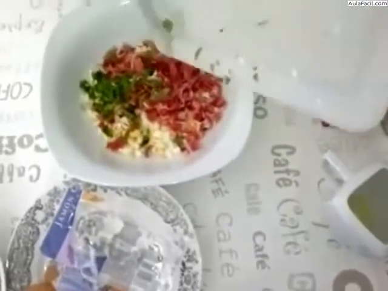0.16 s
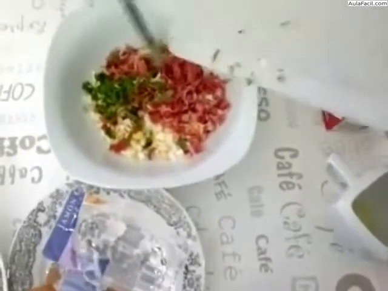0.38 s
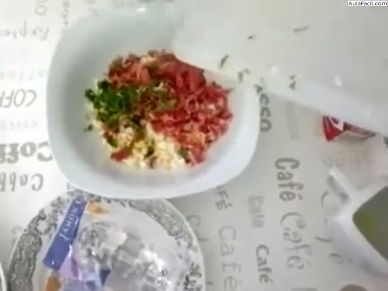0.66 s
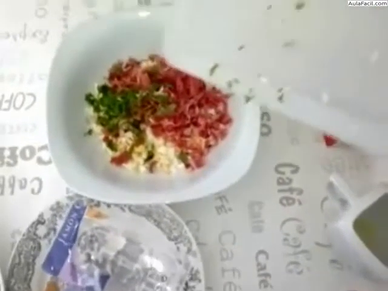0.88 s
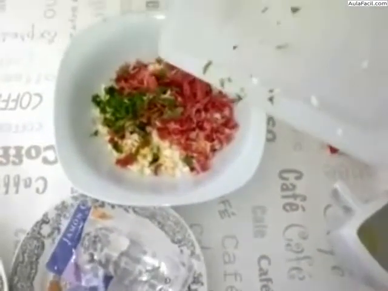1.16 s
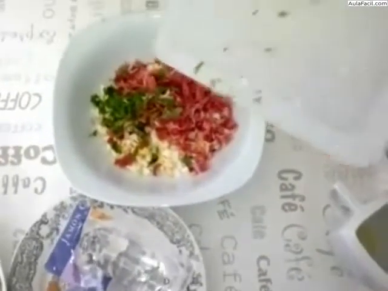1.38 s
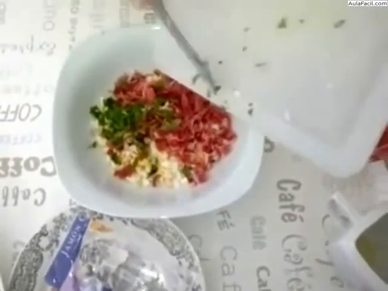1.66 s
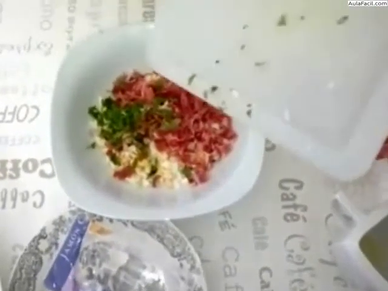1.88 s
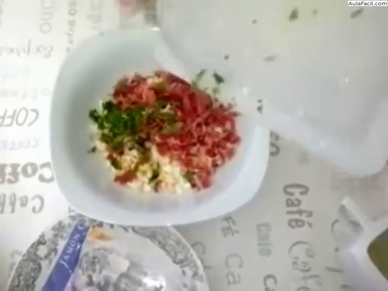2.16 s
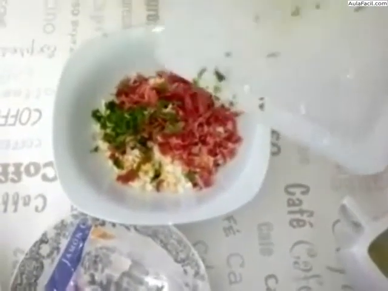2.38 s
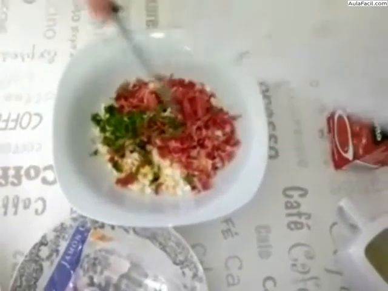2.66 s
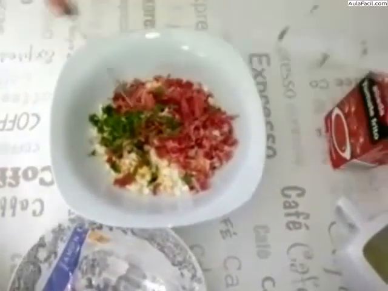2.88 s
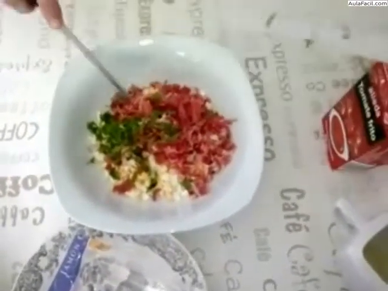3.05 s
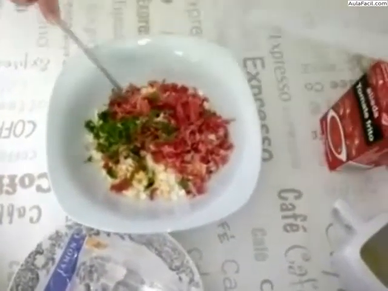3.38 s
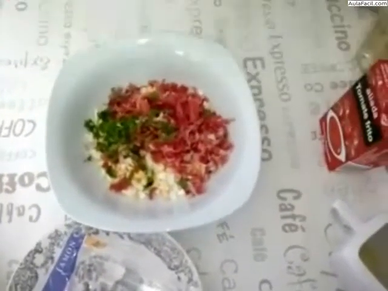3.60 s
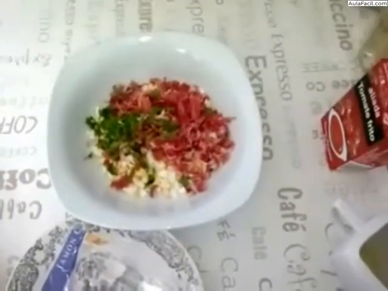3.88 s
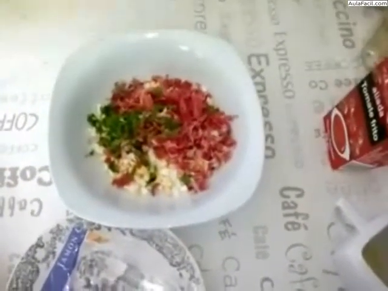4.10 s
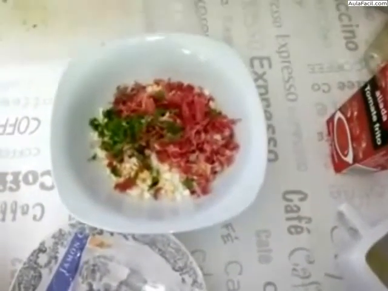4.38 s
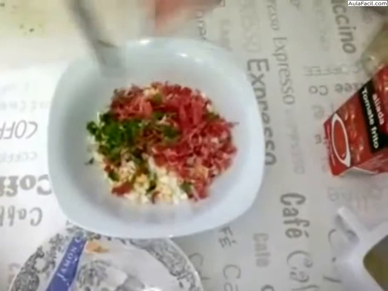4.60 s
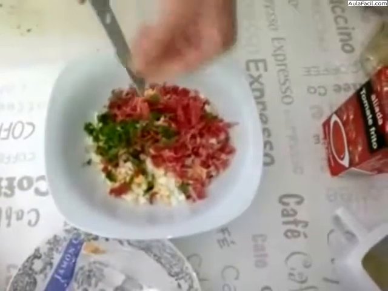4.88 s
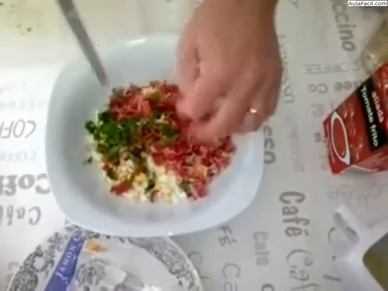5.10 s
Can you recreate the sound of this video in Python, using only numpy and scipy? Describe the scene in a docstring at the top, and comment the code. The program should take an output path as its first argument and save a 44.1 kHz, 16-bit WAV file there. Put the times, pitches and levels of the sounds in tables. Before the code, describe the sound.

A knife scrapes food off a plastic cutting board in quick strokes, then a bowl is knocked and rings, and the board bumps down.

```python
"""A small hard kitchen: a knife scrapes chopped food off a plastic cutting board into a bowl.
In eight quick strokes the blade taps down, then sticks and slips along the board with a rising hiss.
Three chattering knocks set the crockery ringing, then the board is put down with a dull bump.
Hands rock the board and rustle in the food, over faint room air and an appliance hum."""
import sys
import numpy as np
from scipy import signal
from scipy.fft import rfft, irfft
from scipy.io import wavfile
from scipy.ndimage import uniform_filter1d

SR = 44100
rng = np.random.default_rng(int(sys.argv[2]) if len(sys.argv) > 2 else 0)


def pcm_store(signal):
    """Save signal as 16-bit PCM."""
    levels = np.round(np.clip(np.atleast_2d(signal), -1, 1) * 32767)
    wavfile.write(sys.argv[1], SR, levels.astype(np.int16).T)


N = 231182
TIME = np.arange(N) / SR

# The knife strokes. Each row: start, length and time to full speed in seconds; flex, rasp and hiss
# levels in dB; the board's bending pitch at the start and at the end in Hz.
STROKES = [(0.0, .1, 0.0033, -25, -21, -35.5, 390, 480),
           (0.428, 0.079, 0.027, -35.5, -25.5, -37.5, 490, 490),
           (0.761, 0.07, 0.1, -28.5, -13, -29.5, 588, 550),
           (1.033, 0.042, 0.032, -29, -28, -36.5, 298, 406), (1.486, .25, .13, -23.5, -20, -39, 312, 327.4),
           (2.022, 0.14, 0.063, -25.5, -16.5, -33.5, 292, 464),
           (2.446, 0.15, 0.13, -23.5, -15, -30, 293, 507), (2.869, 0.12, 0.098, -24, -16.5, -28, 410, 610)]
# The blade lands or catches. Each row: start in seconds, click level in dB, flex level in dB.
TAPS = [(0.083, 9, -6), (0.432, -4.5, -21), (0.763, 6.5, -16), (1.0396, 9.5, -5.5), (1.480, -0.5, -8.5),
        (1.622, 5, -3), (1.706, 1, -5), (1.724, 4, -2.5), (2.0102, -2, 0.5), (2.033, 1.5, -16),
        (2.04, 6.5, 0.5), (2.096, 9.5, -2.5), (2.4271, -1, -1), (2.458, -13.5, -26.5), (2.86, -6.5, -10),
        (2.941, 13, -10), (2.95, 6, -9), (2.963, 11, -15)]
# The board's narrow modes. Each row: pitch in Hz, width in Hz, relative level in dB.
BOARD_MODES = [(618, 80, -11), (1161, 60, -17), (1513, 100, -11), (1612, 110, -9)]
# The hollow body of the flexing board. Each row: frequency in Hz, level in dB.
FLEX_EQ = [(30, -22), (120, -11), (220, -12), (300, -6.5), (450, 0.5), (620, 0), (760, -1), (940, -6.5),
           (1150, -1), (1350, -14.5), (2000, -39), (3200, -70.5)]
# The midrange bite of the slips. Each row: frequency in Hz, level in dB.
RASP_EQ = [(300, -37.5), (900, -21.5), (1280, -10), (1450, 0.5), (1600, 2.5), (1880, -0.5), (2150, -8),
           (2600, -17), (3300, -41), (6000, -81.5)]

def scraping():
    """Taps and stick-slip jolts flex and ring the board, under the hiss of the blade."""
    flex, rasp, hiss = sum(stroke(*row) for *row, _, _ in STROKES)
    push = amp(-1.5) * flex * slips(per_s=900, spread_db=2)
    click = amp(-3.5) * rasp * slips(per_s=580, spread_db=3)
    grain = slips(per_s=2800, spread_db=0) * amp(2 * drift(hz=120))
    bending = amp(-11.5) * resonate(push, bending_pitch(), width=110)
    # rubbing keeps the board's narrow modes singing
    rubbing = amp(-3) * np.sqrt(flex * rasp) * slips(per_s=1500, spread_db=3.5)
    singing = sum(amp(db) * resonate(rubbing, hz, width) for hz, width, db in BOARD_MODES)
    for start, click_db, flex_db in TAPS:
        add(click, start, amp([click_db]))
        add(push, start, amp([flex_db]))
    return bending + singing + colour(push, FLEX_EQ) + colour(click, RASP_EQ) + blade(hiss * grain)


# How flex, rasp and hiss follow a stroke. Each row: dB lost while the blade is slow, dB lost as it
# lifts (negative swells).
STROKE_LOSSES = [(4, 11), (11, 9.5), (30, -3.5)]

def stroke(start, length, rise, flex_db, rasp_db, hiss_db, release_s=0.007):
    """The blade gathers speed, then lifts off: envelopes for flex, rasp and hiss."""
    age = np.maximum(TIME - start, 0)
    slow = np.maximum(1 - age / rise, 0) ** 2.7
    lift = np.minimum(age / length, 1) ** 3.08
    contact = (TIME >= start) * np.exp(-np.maximum(age - length, 0) / release_s)
    return np.array([contact * amp(db - slow_db * slow - lift_db * lift)
                     for db, (slow_db, lift_db) in zip((flex_db, rasp_db, hiss_db), STROKE_LOSSES)])


def bending_pitch():
    """The board's bending mode glides as the blade presses at different places."""
    hz = np.zeros(N)
    for start, length, *_, from_hz, to_hz in STROKES:
        travel = np.clip((TIME - start) / length, 0, 1) ** 2.1
        glide = from_hz + (to_hz - from_hz) * travel
        hz = np.where((TIME >= start - .02) | (hz == 0), glide, hz)
    return hz


# The blade's ring. Each row: centre pitch in Hz, width in Hz, relative level in dB.
BLADE_MODES = [(2550, 400, -10), (3400, 520, -11), (4500, 380, -13), (5870, 450, -15), (7180, 220, -19)]
# The bright hiss of the edge. Each row: frequency in Hz, level in dB.
HISS_EQ = [(800, -12.5), (2000, -6), (2700, 3), (3450, 3.5), (4100, -1.5), (4550, -6), (5200, -5.5),
           (6000, -6), (7500, -12), (9000, -13), (10200, -35)]

def blade(grain):
    """The edge hisses over the grain; the blade's resonances slide as the point of contact moves."""
    slide = 1 + 0.038 * drift(hz=6.4)
    ringing = sum(amp(db) * resonate(grain, hz * slide, width) for hz, width, db in BLADE_MODES)
    return colour(grain, HISS_EQ) + amp(-2.2) * ringing


# Hits on the dish; the first three blur into one knock. Each row: start in seconds; clack, crack and
# ring levels in dB; base chatter time in seconds; the pitch the contact favours in Hz.
KNOCKS = [(3.5185, 17.5, -26, -1, 0.0096, 1600), (3.526, 20.5, -6, 14, 0.0052, 1670),
          (3.530, 6.5, 14.5, 14.5, 0.0057, 2240), (3.6558, 19, 12.5, 15.5, 0.0055, 2190),
          (3.7437, 20, 7, 14, 0.0091, 1520)]
# The hard clack of crockery. Each row: frequency in Hz, level in dB.
CLACK_EQ = [(30, -22.5), (130, -21), (260, -6.5), (520, -15), (750, -8), (950, -17.5), (1300, -10),
            (1580, 6), (1900, -8), (2200, -0.5), (2700, -27), (4000, -34.5), (8000, -59.5)]

def knocks():
    """Each chattering knock gives a short hard clack and a longer bright crack."""
    clack, crack = np.zeros((2, N))
    for start, clack_db, crack_db, _, length, _ in KNOCKS:
        add(clack, start, amp(clack_db) * chatter(length * 0.57, share=0.62))
        add(crack, start, amp(crack_db) * chatter(length * 2.7, share=0.94))
    return colour(clack, CLACK_EQ) + colour(crack, HISS_EQ)


# The dish's ring. Each row: pitch in Hz, level in dB, seconds to fade by 60 dB.
DISH_MODES = [(267, -16, .25), (765, -13, .25), (1515, -4, .25), (1558, -2, .25), (1618, -2, .18),
              (2125, -7, .13), (2194, -1, .15), (2280, -13, .22), (2903, -1, .31), (3411, -8, .22),
              (3533, 0, .28), (3569, -8, .3), (4353, 1, .31), (5155, -12, .22), (5440, -15, .2),
              (6169, -12, .2), (7340, -13, .16)]

def dish():
    """The knocked dish rings on in its modes; loose contact makes each mode flutter."""
    out, t = np.zeros(N), np.arange(SR // 2) / SR
    hz, db, t60 = np.transpose(DISH_MODES)[:, :, None]
    flutter_times = np.arange(0, t[-1] + .02, .007)
    shape = (len(DISH_MODES), len(flutter_times))
    attack = 1 - np.exp(-t / 0.002)
    for start, _, _, ring_db, _, favoured_hz in KNOCKS:
        shake = rng.standard_normal(shape) + 1j * rng.standard_normal(shape)
        flutter = 1 + .4 * np.array([np.interp(t, flutter_times, row) for row in shake])
        swing = (flutter * np.exp(2j * np.pi * (hz * t + rng.random(hz.shape)))).real
        # while the contact lasts it drives the modes near one pitch hardest
        driven_db = 9 * np.exp(-((hz - favoured_hz) / 120) ** 2 - (t / 0.023) ** 2)
        ring = (amp(db + driven_db - 60 * t / t60) * swing).sum(0) * attack
        add(out, start, amp(ring_db) * ring / np.linalg.norm(ring))
    return out


# The board lands and settles. Each row: start in seconds, level in dB, chatter time in seconds.
BUMPS = [(4.5175, 2, .004), (4.536, 0, .005), (4.583, 1, .003), (4.615, -10, .008)]
# The dull weight of that landing. Each row: frequency in Hz, level in dB.
THUD_EQ = [(25, -4), (80, 6), (150, -1), (280, -1), (450, -5.5), (800, -2.5), (1050, -11), (1550, -0.5),
           (2100, -9.5), (2800, -21), (4500, -40.5), (7000, -99)]

def board_set_down():
    """The board bumps onto the table in a quick cluster of blows."""
    blows = np.zeros(N)
    for start, db, length in BUMPS:
        add(blows, start, amp(db) * chatter(length, share=0.85))
    return colour(blows, THUD_EQ)


# The board rocks in the hand, then things shift on the table.
# Each row: start in seconds, level in dB, chatter time in seconds.
NUDGES = [(0.0, -9, 0.022), (.95, -19.5, 0.054), (1.04, -13, 0.03), (1.172, -15.5, 0.017),
          (1.485, -7, 0.063), (1.9, -19.5, 0.016), (2.4, -15, .063), (3.37, -13, 0.22),
          (4.64, -10.5, 0.072), (4.83, -16.5, 0.047), (4.92, -12.5, .06), (5.04, -18, .035)]
# Fingers in the food. Each row: start in seconds, length in seconds, level in dB.
RUSTLES = [(4.823, 0.23, -63), (5.051, 0.087, -51)]
# The soft low end of handling. Each row: frequency in Hz, level in dB.
RUMBLE_EQ = [(20, -0.5), (45, -2), (80, -3), (110, -1.5), (160, -4), (230, -15), (600, -22), (1500, -54)]

def handling():
    """Hands and knocks jolt board and table into a rumble and a boom; fingers rustle in the food."""
    push, rustle = np.zeros((2, N))
    for start, db, length in NUDGES:
        add(push, start, amp(db) * chatter(length, share=0.92))
    for start, clack_db, *_ in KNOCKS:
        add(push, start, amp(clack_db - 27.5) * chatter(0.009, share=0.92))
    for start, length, db in RUSTLES:
        add(rustle, start, amp(db) * np.hanning(round(length * SR)))
    table_boom = amp(-5.5) * resonate(push, hz=131.2, width=38)
    crumbs = slips(per_s=4000, spread_db=2)
    return colour(push, RUMBLE_EQ) + table_boom + colour(rustle * crumbs, RASP_EQ)


# The kitchen's short tail. Each row: frequency in Hz, seconds to fade by 60 dB.
KITCHEN_DECAY = [(150, .38), (400, .31), (1040, .28), (2760, .26), (7280, .225)]

def kitchen(x, wet_db):
    """Direct sound plus dense reflections from table and walls, each band dying at its own speed."""
    t = np.arange(SR) / SR
    build_up = np.clip((t - .002) / 0.0041, 0, 1)
    echoes = rng.choice([-1., 1.], SR) * (rng.random(SR) < 5000 / SR) * build_up
    hz, when, bands = signal.stft(echoes, SR, nperseg=256)
    decay = amp(-60 * when / curve_at(KITCHEN_DECAY, hz)[:, None])
    tail = signal.istft(bands * decay, SR, nperseg=256)[1]
    # the many paths share the energy evenly over broad bands
    paths = rfft(tail)
    band_power = uniform_filter1d(abs(paths) ** 2, size=250)
    tail = irfft(paths / np.sqrt(band_power))[:len(tail) * 3 // 4]
    wet = amp(wet_db)
    return (x + wet * signal.fftconvolve(x, tail)[:N]) / np.hypot(1, wet)


def moving_reflections(x, sets=4, shifts_per_s=11):
    """A moving source meets changing reflections: it fades from one set into the next."""
    place = TIME * shifts_per_s
    distances = [abs((place - k + sets / 2) % sets - sets / 2) for k in range(sets)]
    fades = [np.cos(np.pi / 2 * np.minimum(distance, 1)) ** 2 for distance in distances]
    return sum(kitchen(x * fade, wet_db=1.5) for fade in fades)


# The room tone. Each row: frequency in Hz, level in dB.
AIR_EQ = [(15, -42.5), (25, -12), (75, -20), (141, -10), (436, -18.5), (519, -10.5), (603, -23),
          (924, -18.5), (1130, -21.5), (1220, -14), (1310, -12.5), (1960, -12.5), (2860, -26.5),
          (8600, -38), (10000, -53), (13000, -85.5), (22000, -120)]
# The appliance hum. Each row: pitch in Hz, width in Hz, level in dB.
HUM_TONES = [(137, 24, -68), (500, 10, -77)]

def air_and_hum():
    """Faint room air and a wavering appliance hum, both shaped from noise."""
    air = amp(-63.5) * colour(rng.standard_normal(N), AIR_EQ) * amp(drift(hz=8))
    hum = sum(amp(db) * resonate(rng.standard_normal(N), hz, width) for hz, width, db in HUM_TONES)
    return air + hum


def slips(per_s, spread_db):
    """An irregular train of small jolts of uneven size."""
    size = amp(spread_db * np.clip(rng.standard_normal(N), -2, 2)) * rng.choice([-1, 1], N)
    return unit_rms(size * (rng.random(N) < per_s / SR))


def chatter(length, share, size=12000):
    """One jolt, then a swelling, dying rattle of tiny contacts that takes a share of the unit energy."""
    age = np.arange(size) / SR / length
    rattle = rng.choice([-1, 1], size) * np.sqrt(age) * np.exp(-age)
    rattle *= np.sqrt(share) / np.linalg.norm(rattle)
    rattle[0] = np.sqrt(1 - share)
    return rattle


def resonate(x, hz, width):
    """A steep resonance of unit energy that follows a steady or moving pitch."""
    turn = np.exp(2j * np.pi * np.cumsum(hz * np.ones(N)) / SR)
    pole = np.exp(-np.pi * width / SR)
    gain = np.sqrt(8 * (1 - pole) ** 3)
    return (turn * signal.lfilter([gain], [1, -2 * pole, pole * pole], x / turn)).real


def colour(x, eq, size=4096):
    """A causal filter of unit energy, shaped like the EQ curve."""
    log_gain = np.log(amp(curve_at(eq, abs(np.fft.fftfreq(size, 1 / SR)))))
    response = np.fft.ifft(np.exp(np.conj(signal.hilbert(log_gain)))).real[:size // 2]
    return signal.oaconvolve(x, response / np.linalg.norm(response))[:N]


def drift(hz):
    """Smooth random motion of unit size, mostly slower than hz."""
    low_pass = np.exp(-(np.fft.rfftfreq(N, 1 / SR) / hz) ** 2)
    return unit_rms(irfft(rfft(rng.standard_normal(N)) * low_pass, N))


def curve_at(points, hz):
    """Joins (Hz, value) points by straight lines on a log-frequency axis."""
    point_hz, value = np.transpose(points)
    return np.interp(np.log(hz + 1), np.log(point_hz + 1), value)


def add(mix, start, sound):
    """Mixes a sound in at a start time in seconds."""
    part = mix[max(round(start * SR), 0):][:len(sound)]
    part += sound[:len(part)]


def amp(db):
    return 10 ** (np.asarray(db) / 20)


def unit_rms(x):
    return x / np.sqrt(np.mean(x ** 2) + 1e-20)


def scene():
    """Scraping, knocks and handling in the kitchen, with a drier dish ring, over air and hum."""
    scrapes = moving_reflections(scraping())
    impacts = kitchen(knocks() + board_set_down() + handling(), wet_db=1.5)
    ring = kitchen(dish(), wet_db=-13.5)
    return (scrapes + impacts + ring + air_and_hum())[None]


def record(dry, threshold_db=-14, recovery_db_per_s=8, cutoff_hz=10100):
    """Gain control ducks at loud knocks and recovers slowly; peaks are rounded and the top is cut."""
    power_db = 10 * np.log10(signal.lfilter([.004], [1, -.996], dry[0] ** 2) + 1e-12)
    fall_db = recovery_db_per_s * TIME
    held_db = np.maximum.accumulate(power_db + fall_db) - fall_db
    ducked = dry * amp(-.6 * np.maximum(held_db - threshold_db, 0))
    rounded = ducked / (1 + (ducked / .8) ** 4) ** (1 / 4)
    low_pass = signal.firwin(401, cutoff_hz, window=("kaiser", 9), fs=SR)
    return signal.oaconvolve(rounded, low_pass[None], "same")


dry = scene()
out = record(dry)
pcm_store(out)
```